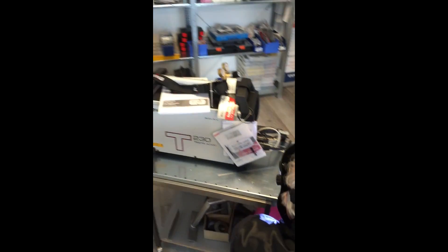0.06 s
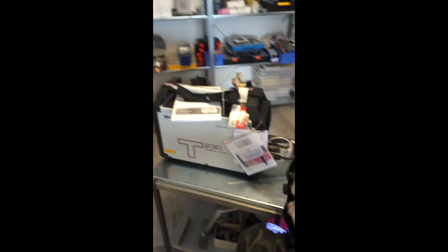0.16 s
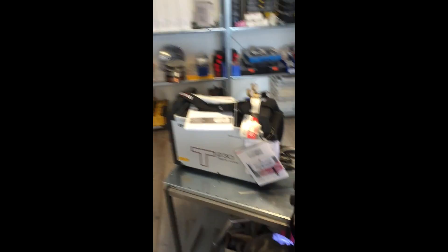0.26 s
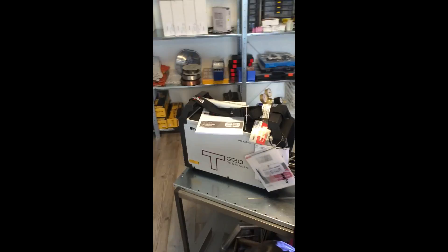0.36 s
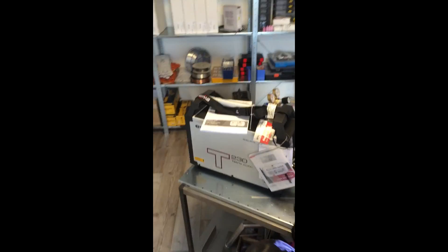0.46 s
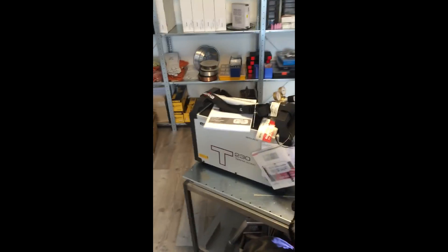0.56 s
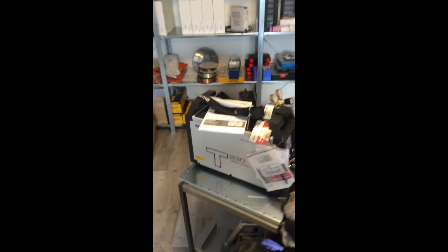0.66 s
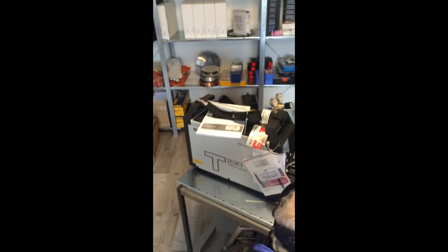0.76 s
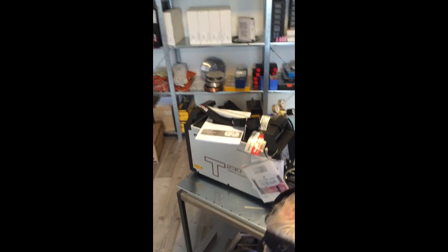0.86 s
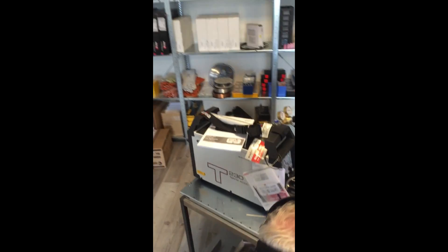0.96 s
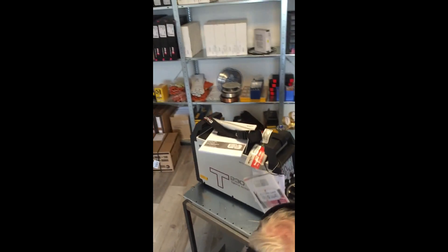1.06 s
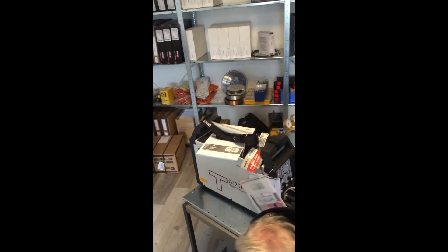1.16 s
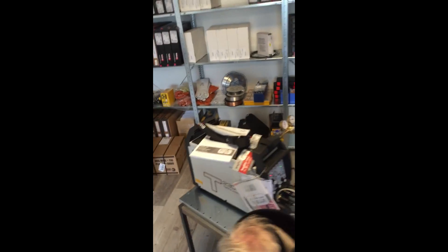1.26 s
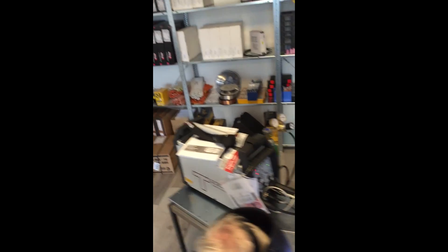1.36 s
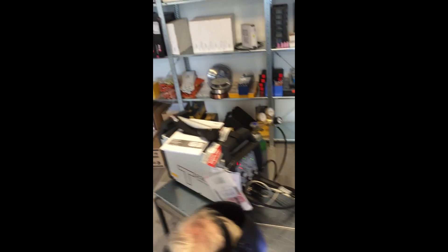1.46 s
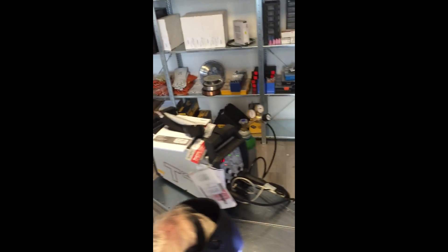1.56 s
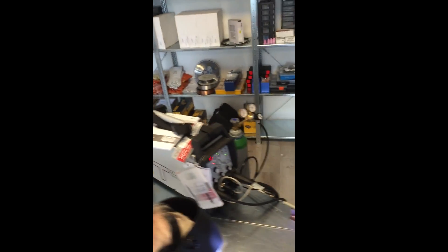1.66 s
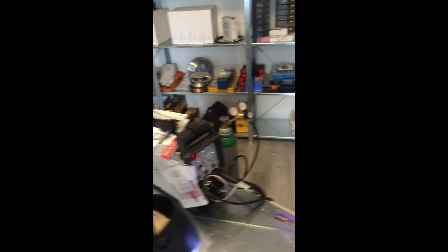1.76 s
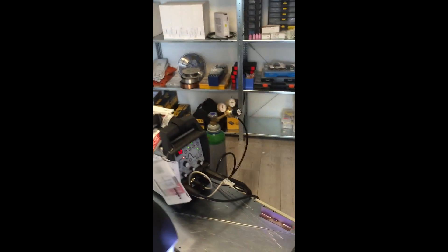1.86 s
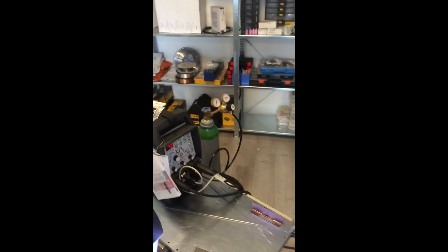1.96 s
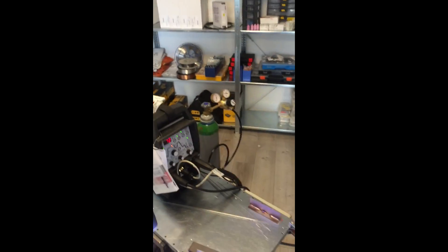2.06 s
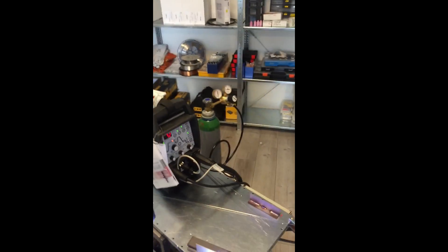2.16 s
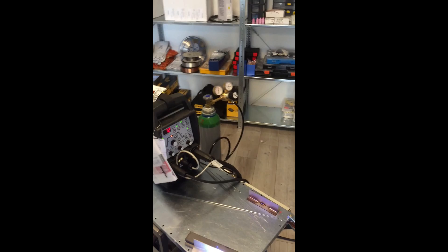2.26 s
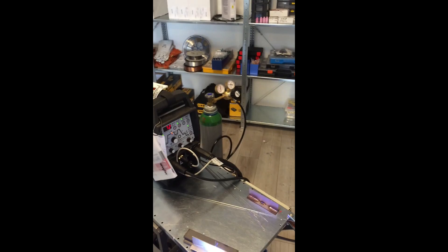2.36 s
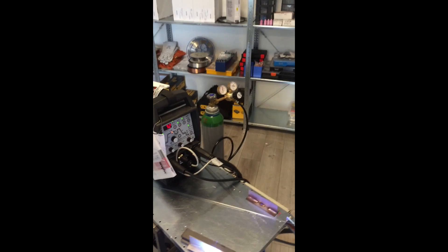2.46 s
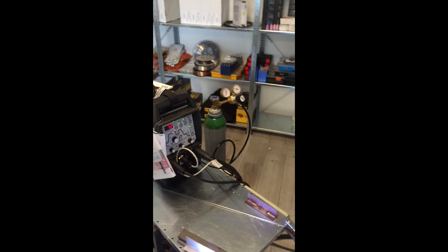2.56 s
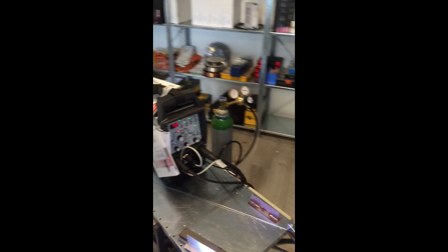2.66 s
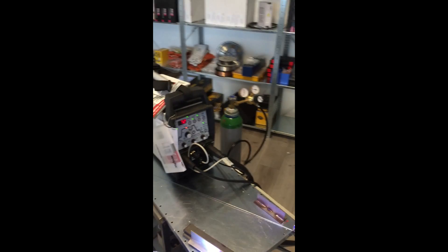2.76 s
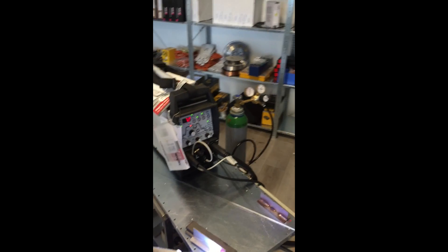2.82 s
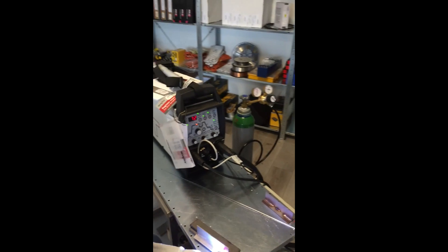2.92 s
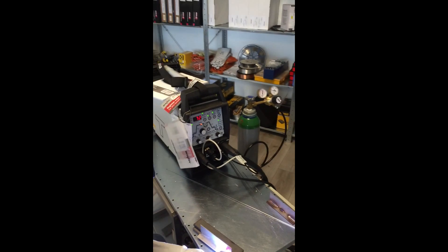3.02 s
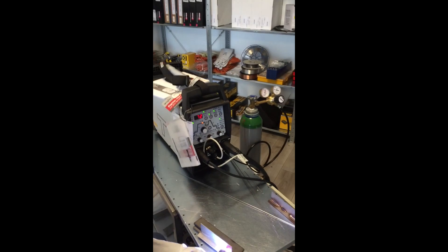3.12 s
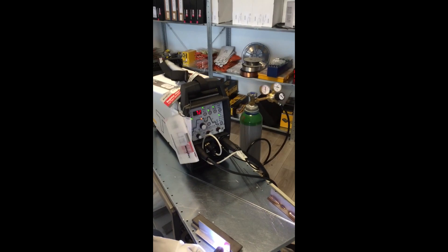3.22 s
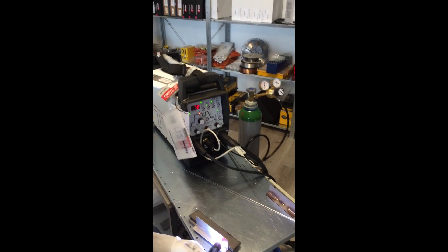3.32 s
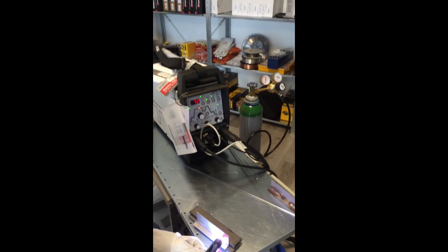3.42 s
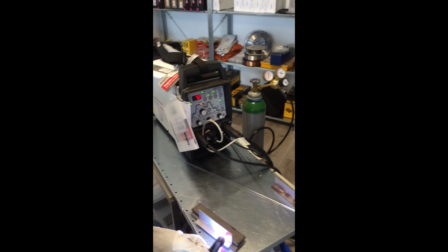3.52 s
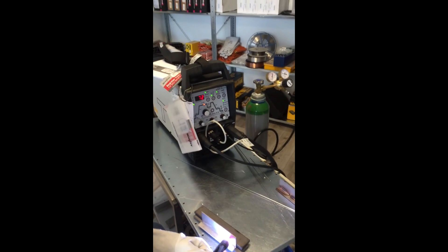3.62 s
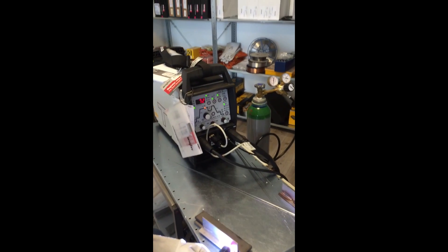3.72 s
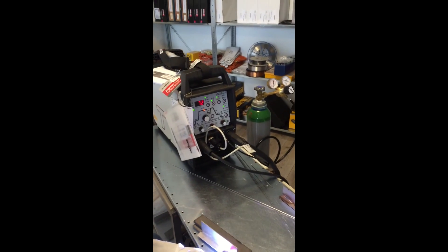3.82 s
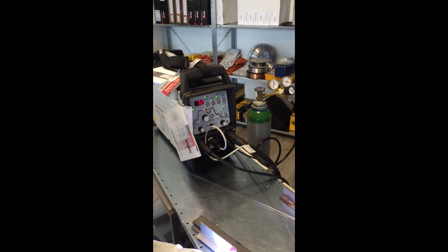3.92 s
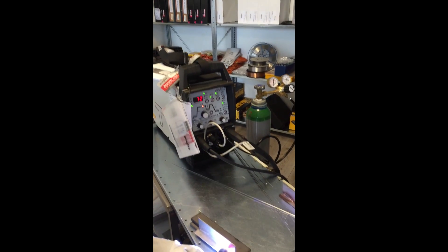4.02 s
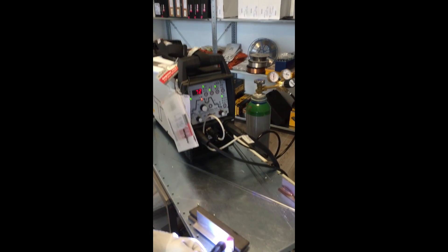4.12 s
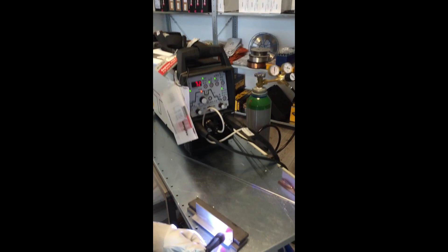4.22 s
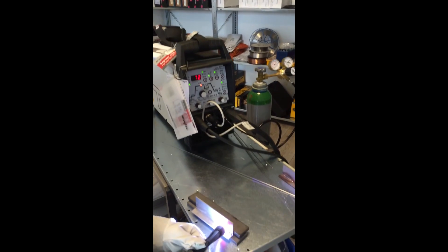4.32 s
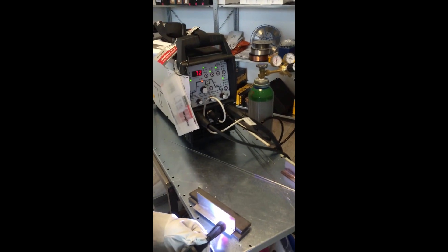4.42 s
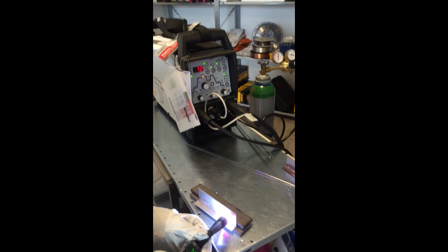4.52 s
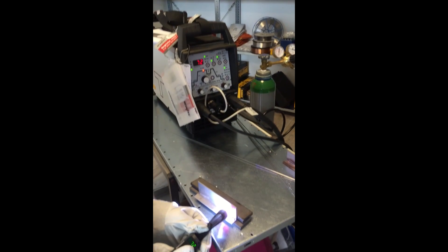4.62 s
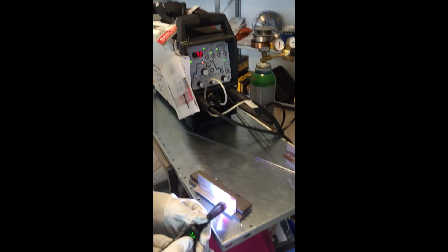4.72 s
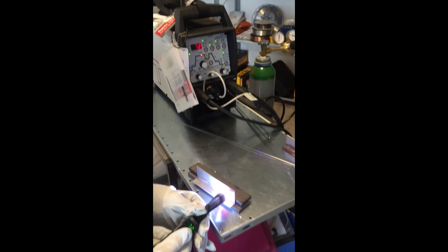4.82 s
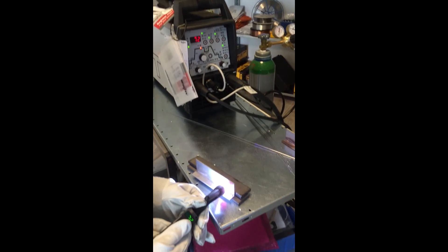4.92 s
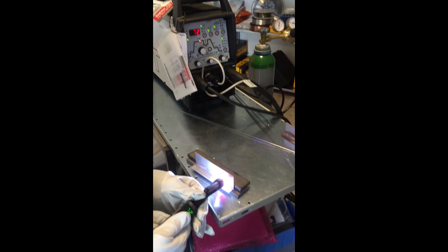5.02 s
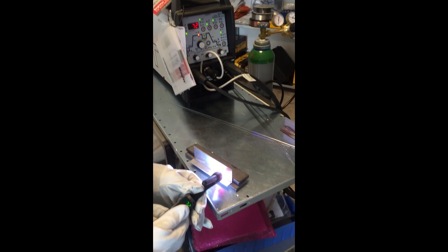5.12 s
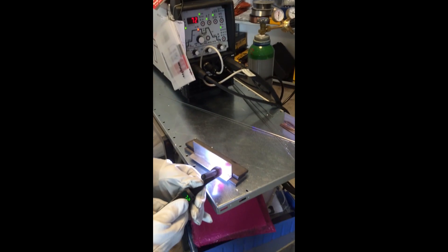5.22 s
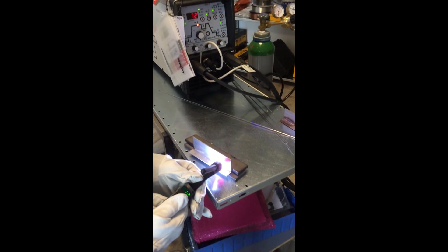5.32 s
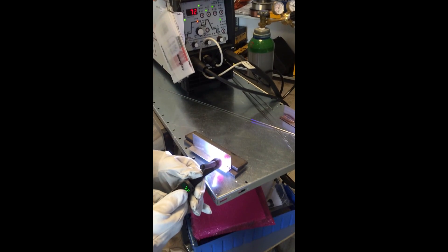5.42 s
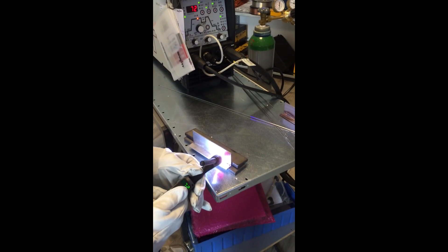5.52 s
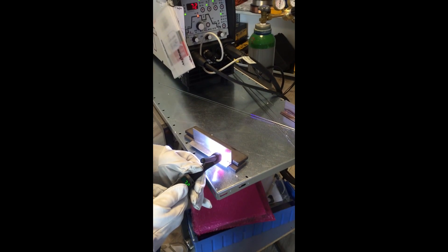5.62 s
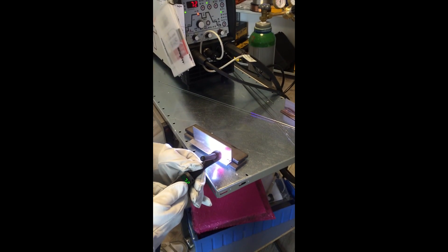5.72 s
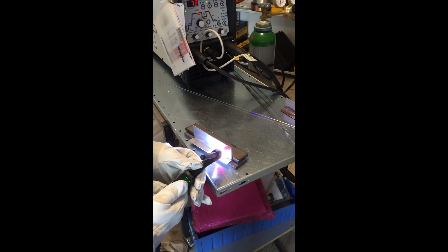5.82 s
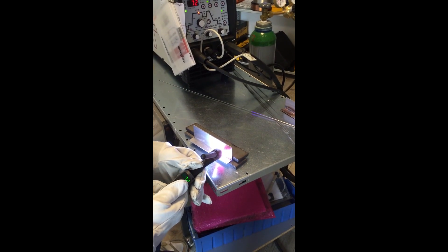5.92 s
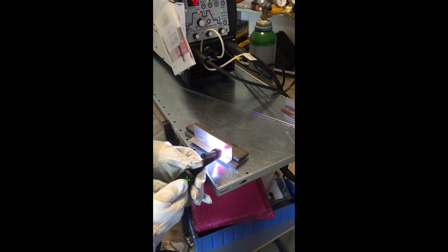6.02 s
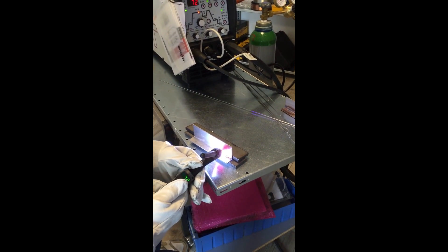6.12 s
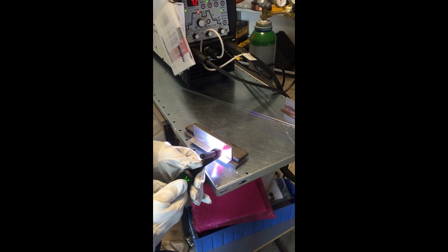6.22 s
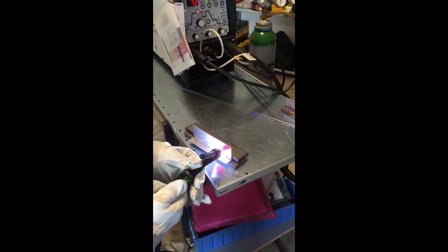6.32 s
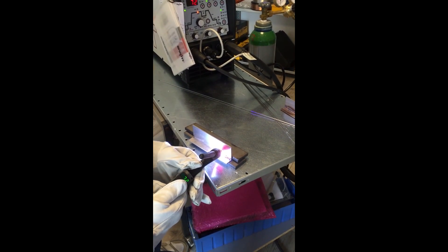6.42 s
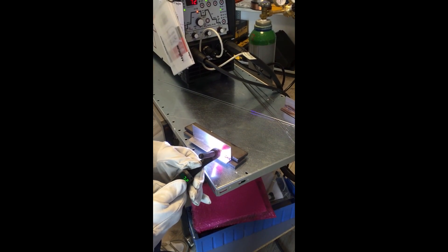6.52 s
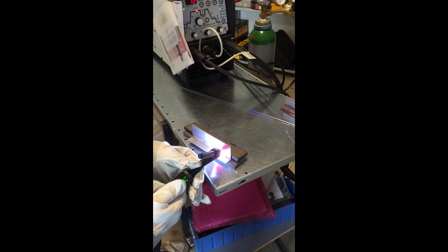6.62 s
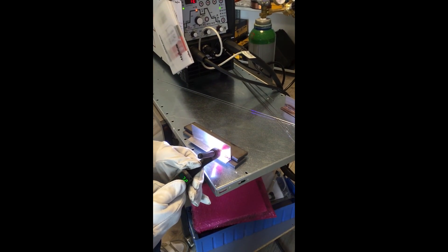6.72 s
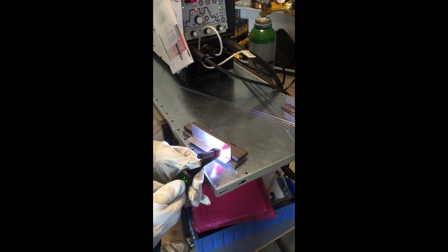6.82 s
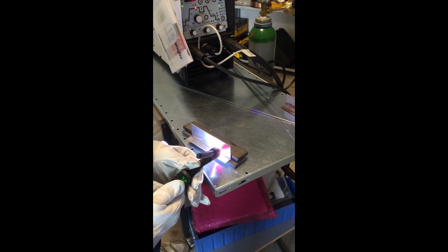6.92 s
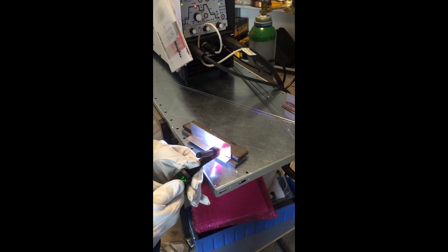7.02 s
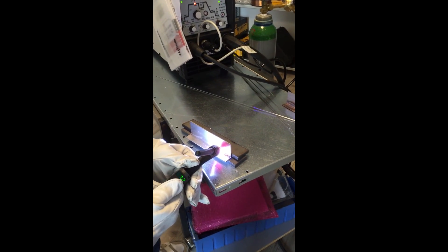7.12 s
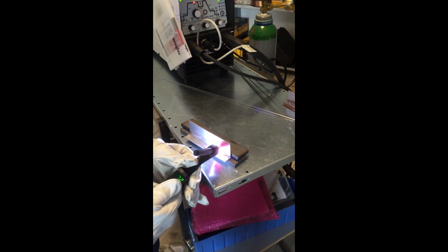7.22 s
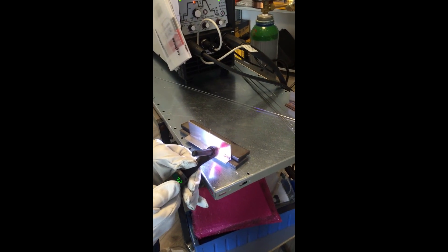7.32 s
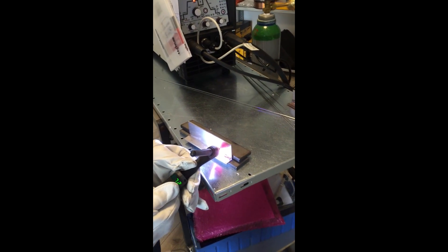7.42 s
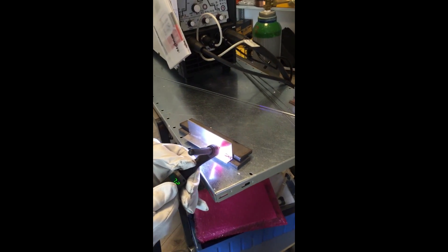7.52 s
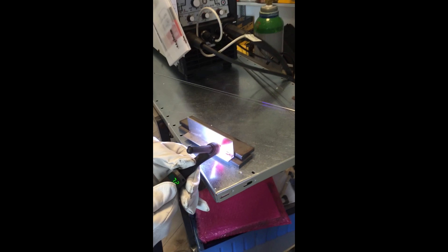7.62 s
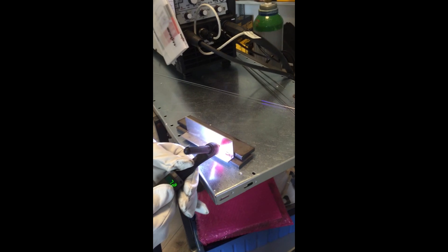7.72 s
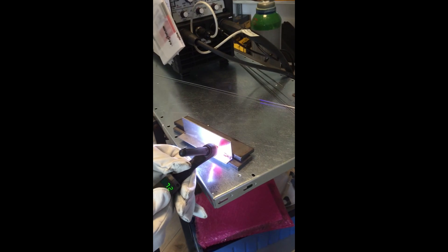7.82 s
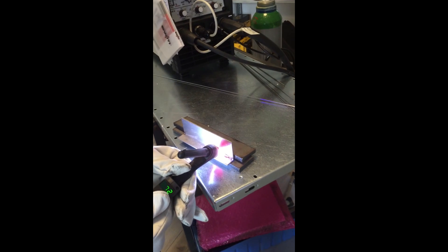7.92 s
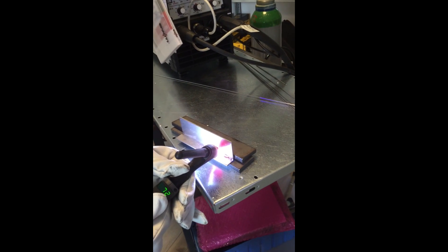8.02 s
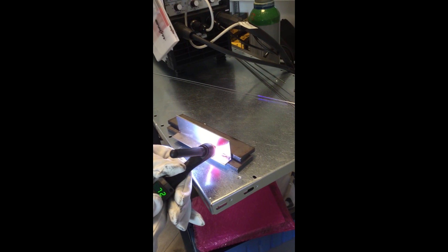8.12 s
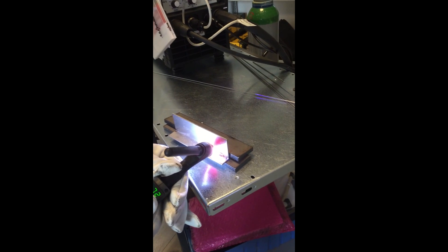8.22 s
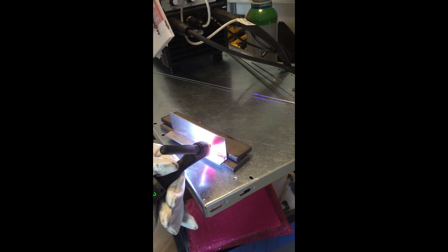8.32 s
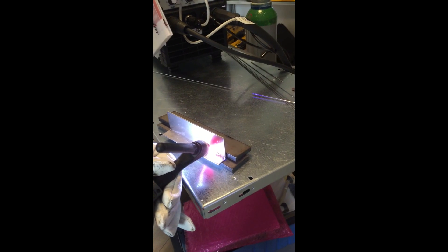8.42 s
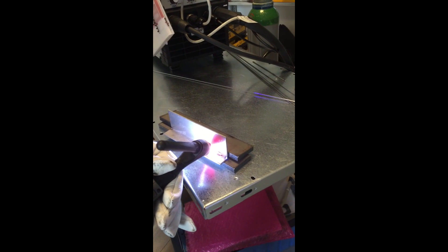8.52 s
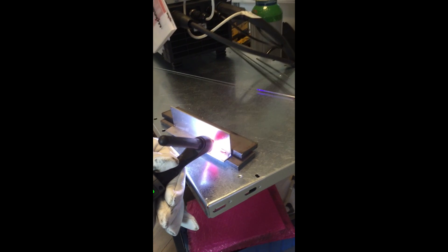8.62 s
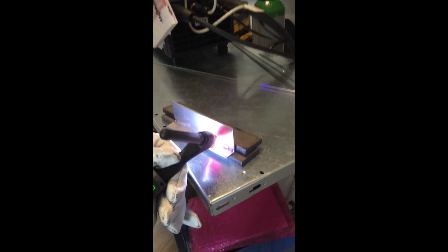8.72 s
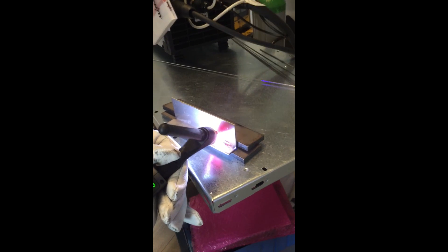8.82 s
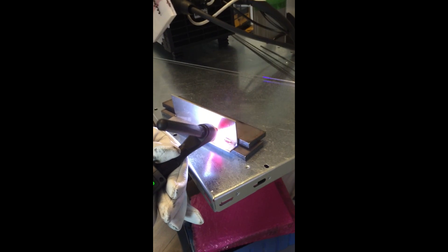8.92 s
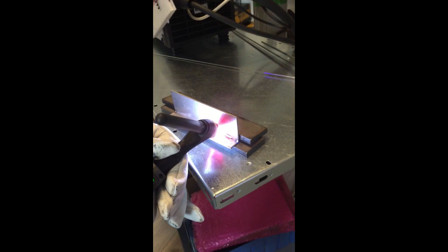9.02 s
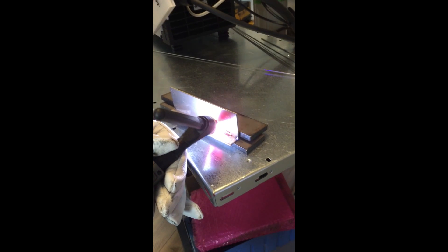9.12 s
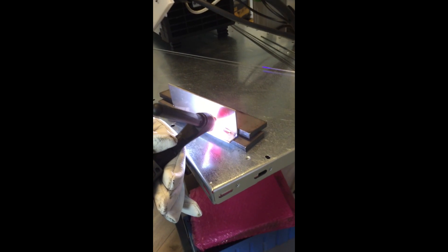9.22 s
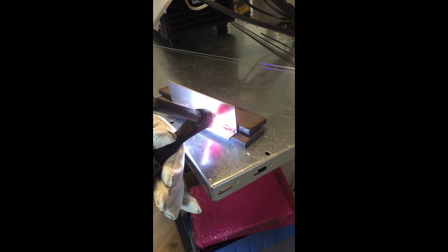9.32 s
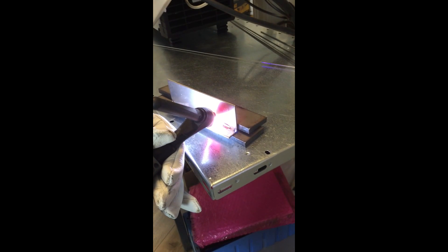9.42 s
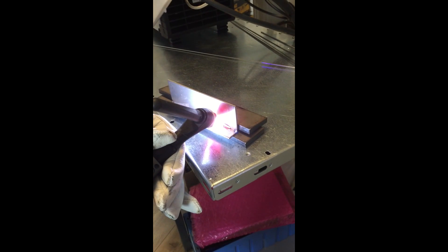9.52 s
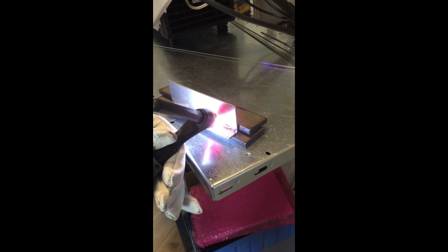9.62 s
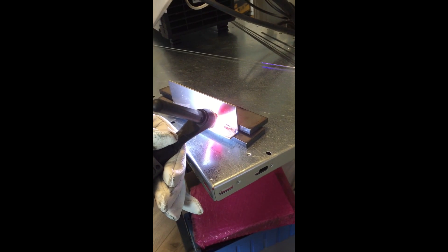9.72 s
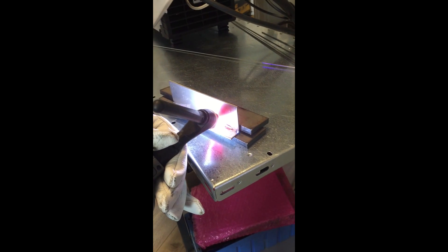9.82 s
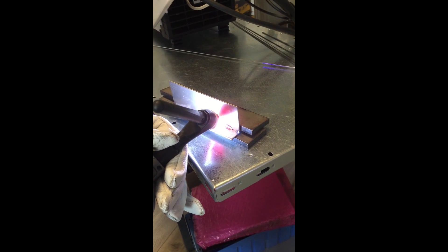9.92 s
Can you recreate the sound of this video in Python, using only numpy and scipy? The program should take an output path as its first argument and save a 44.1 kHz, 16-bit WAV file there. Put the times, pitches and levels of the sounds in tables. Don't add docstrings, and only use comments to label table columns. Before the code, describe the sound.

A gas jet and electric arc rush steadily over a metal bench, first from behind equipment, then directly and close. The microphone moves in, so the hiss gets louder and its hollow, sweeping metallic colour slides downward. A faint piercing whine fades in and out; low thuds and knocks mark the walk early on, small crackles pop, and a faint stool creak comes near the end.

```python
import sys
import numpy as np
from scipy import signal
from scipy.fft import rfft, irfft, next_fast_len
from scipy.io import wavfile
from scipy.ndimage import uniform_filter1d, map_coordinates

SR = 44100
rng = np.random.default_rng(int(sys.argv[2]) if len(sys.argv) > 2 else 0)


def bounce(signal):
    frames = np.transpose(np.atleast_2d(signal))
    limited = np.clip(frames, -1, 1)
    pcm = np.round(limited * 32767).astype(np.int16)
    wavfile.write(sys.argv[1], SR, pcm)


def field_ratio(decibels):
    return 10 ** (np.asarray(decibels, dtype=float) / 20)


N = 439224
TIME = np.arange(N) / SR
SIZE = next_fast_len(N + 8000)
HZ = np.fft.rfftfreq(SIZE, 1 / SR) + 1
LOG_HZ = np.log(HZ)

# [t/s, level/dB]
HISS_LEVEL = [(0.0, -56.5), (0.16, -62.5), (0.22, -57), (0.4, -52), (0.94, -53), (1.06, -47.5), (1.3, -46),
              (1.5, -46), (2.0, -43.5), (2.38, -46), (3.3, -45.5), (3.94, -46), (4.4, -44), (4.88, -43.5),
              (5.49, -44.5), (5.75, -45.5), (5.95, -44), (6.18, -44.5), (6.88, -46.5), (6.96, -44.5),
              (7.3, -44), (7.55, -43), (7.75, -44), (8.13, -42), (8.24, -43.5), (8.46, -43.5), (8.8, -42.5),
              (9.15, -40), (9.4, -41), (9.96, -42)]
# [t/s, share hidden]
HIDDEN = [
    (0, 1),
    (.17, 0.58),
    (.24, 0.37),
    (.62, 0.81),
    (.8, 0.04),
    (1.0, 0.14),
    (1.06, 0),
    (1.2, 0),
]


def rms_one(x):
    return x / np.sqrt(np.mean(x ** 2) + 1e-20)


def in_time(rows):
    s, *columns = np.transpose(rows)
    return [np.interp(TIME, s, c) for c in columns]


def at_hz(points):
    points = np.array(points)
    return field_ratio(np.interp(LOG_HZ, np.log(points[:, 0]), points[:, 1]))


def drift(rate_hz):
    r = np.exp(-2 * np.pi * rate_hz * 40 / SR)
    chance = rng.standard_normal(N // 40 + 2002)
    slow = signal.lfilter([1], [1, -2 * r, r * r], chance)[2000:]
    return np.interp(np.arange(N) / 40, np.arange(len(slow)), rms_one(slow))


def coloured(x, spectrum, low_hz, high_hz, order=6):
    edges = (1 + (low_hz / HZ) ** (2 * order)) * (1 + (HZ / high_hz) ** (2 * order))
    return rms_one(irfft(x * at_hz(spectrum) / np.sqrt(edges), SIZE)[:N])


def late(x, ms):
    return map_coordinates(x, [np.arange(N) - ms * SR / 1000], order=3, mode="mirror")


def hump(at, length):
    return np.exp(-8 * ((TIME - at) / length) ** 2)


def tone(hz, level_db, wobble_hz, flutter_db):
    phase = 2 * np.pi * np.cumsum(hz + wobble_hz * drift(16)) / SR
    return np.sqrt(2) * field_ratio(level_db + flutter_db * drift(15)) * np.sin(phase)


def puff(white, at, length, low_hz, high_hz, db, order=2):
    out = np.zeros(N)
    near = np.abs(TIME - at) < length + .05
    bandpass = signal.butter(order, [low_hz, high_hz], "band", fs=SR, output="sos")
    noise = rms_one(signal.sosfilt(bandpass, white[near]))
    out[near] = field_ratio(db) * noise * hump(at, length)[near]
    return out


def puffs(rows):
    white = rng.standard_normal(N)
    out = np.zeros(N)
    for at, length, hz, octaves, db in rows:
        half = 2 ** (octaves / 2)
        out = out + puff(white, at, length, hz / half, hz * half, db)
    return out


def postures():
    # [t/s, share aside, share close]
    turn = [
        (0, 1, 0),
        (2.4, 0.97, 0.13),
        (3.0, 0.67, 0.23),
        (3.7, 0.51, 0.18),
        (4.3, 0.21, 0.28),
        (7.6, 0.11, 0.53),
        (8.5, 0, 0.76),
        (9.96, 0.094, 1),
    ]
    aside, close = np.clip(in_time(turn), 0, 1)
    return np.array([1 - aside - close, aside, close])


def arc():
    # [f/Hz, level/dB]
    cup_facing = [(410, -53), (700, -12), (783, -21.5), (876, -8), (968, -15), (1160, -13.5), (1530, -1.5),
                  (2110, 5), (2640, -6), (3080, -25), (3400, -56), (4420, -44), (7480, -120)]
    cup_aside = [(410, -42), (700, -45), (906, -17), (1200, -13), (1280, -10.5), (1360, -4), (1470, -11),
                 (1650, -0.5), (2130, 0), (2900, -15), (3400, -12), (4420, -52), (7480, -120)]
    # [f/Hz, level/dB]
    column_facing = [(1590, -68), (2700, -21), (3060, -26.5), (3690, -17.5), (4740, -29.5), (5750, -28.5),
                     (6470, -9.5), (8200, -2), (10100, -10.5), (11100, 1), (11600, -5.5), (11900, 1.5),
                     (12800, 6), (14400, 6), (15800, -9)]
    column_aside = [(1590, -42), (2700, -29), (3020, -50), (3320, -48), (3880, -23.5), (4810, -36),
                    (5300, -20), (5880, -12.5), (7120, -7), (8380, -4), (9440, -12), (11900, 3),
                    (12800, -0.5), (13100, -0.5), (15800, -5.5)]
    column_close = [(1590, 10.5), (2700, -5.5), (3230, -23.5), (3520, -21), (5030, -22), (5450, -15.5),
                    (5820, -18), (6120, -13.5), (6710, -7.5), (7230, -14.5), (8320, -2.5), (10200, -20.5),
                    (11500, -7), (11900, -12), (12800, 2), (14500, 1), (15800, -12.5)]
    borders = [2900, 5600, 10000]
    # [t/s, level/dB]
    swing = [(0, 12.5), (.3, 8.5), (.9, -7.5), (1.4, 0), (2.9, 1.5), (3.6, 4), (4.4, 1.5), (6, -2.5),
             (7.8, -3.5), (8.4, -2), (9.2, -6)]

    straight = jet()
    posture = postures()
    wall_gain = field_ratio(-9.5 + 1.5 * posture[1])
    heard = straight + bench_bounce(straight, posture[2]) + near_and_far_bounces(straight)
    heard = rfft(heard + wall_gain * walls(straight, pace=1.27), SIZE)

    def band(colours, low_hz, high_hz):
        return sum(share * coloured(heard, colour, low_hz, high_hz) for share, colour in zip(posture, colours))

    # facing, aside, close, in dB
    offsets_db = np.array([(-16, -22.5, -11),
                           (-19, -18, -17),
                           (-8, -4, -7),
                           (-2.5, -7.5, -3.5)])
    cup_db, low_db, middle_db, top_db = in_time(HISS_LEVEL)[0] + offsets_db @ posture
    swing_db, = in_time(swing)
    cup_db = cup_db + 0.75 * swing_db
    low_db = low_db - 0.78 * swing_db
    buzz = (1 + .5 * drift(5)) * np.sin(2 * np.pi * 100 * TIME)
    middle_db = middle_db + 0.6 * buzz
    top_db = top_db + 1.0 * buzz

    first, second, third = borders
    cup = (cup_facing, cup_aside, cup_facing)
    column = (column_facing, column_aside, column_close)
    out = field_ratio(cup_db + 1.5 * drift(6.0)) * band(cup, 440, 2810)
    out = out + field_ratio(low_db + .5 * drift(9.8)) * band(column, first, second)
    out = out + field_ratio(middle_db + 1.03 * drift(1.5)) * band(column, second, third)
    out = out + field_ratio(top_db + 0.43 * drift(8)) * band(column, third, SR)
    return behind_machine(out)


def jet():
    # [f/Hz, depth]
    mains = [
        (100, .04),
        (200, .03),
        (300, .025),
    ]
    ripple = 1 + sum(depth * np.sin(2 * np.pi * hz * TIME) for hz, depth in mains)
    unrest_db = 0.53 * drift(3.5) + 0.4 * drift(40) + 0.54 * drift(84)
    return rng.standard_normal(N) * ripple * field_ratio(unrest_db) + spits()


def spits():
    # [t/s, level over the hiss/dB]
    bursts = [
        (1.5837, 14),
        (2.682, 18),
        (5.4602, 22),
        (5.6768, 19),
        (7.488, 16),
        (7.952, 13),
    ]
    clicks = np.zeros(N)
    for at, db in bursts:
        clicks[int(at * SR)] = field_ratio(db + 9)
    return signal.lfilter(*signal.butter(1, 4500, fs=SR), clicks + 1e-18)


def bench_bounce(straight, close):
    # [t/s, detour/ms]
    detour = [(2.0, .15), (2.3, .205), (2.5, .252), (2.8, .303), (3.1, .37), (3.25, .389), (3.5, .414),
              (3.8, .432), (4.1, .474), (4.4, .518), (4.9, .574), (5.5, .61), (5.8, .62), (6.4, .625),
              (7.0, .652), (7.3, .678), (7.6, .724), (8.0, .795), (8.4, .857), (8.7, .902), (9.3, .95),
              (9.96, .972)]
    part_shares = [1, -.51, .51, -.066]
    part_delays = [0, .05, .185, .005]
    # [f/Hz, level/dB]
    steel = [(3000, 5.5), (4700, 1), (6000, 0), (7400, 5.5), (8700, -1), (10100, -2.5), (11800, -2.5),
             (13000, -2), (15000, -3)]
    # [t/s, share]
    view = [(2.1, 0), (2.4, .75), (3.0, .7), (3.3, .9), (4.2, .9), (4.8, 1), (6.9, 1), (7.3, .8),
            (7.7, 1.1), (8.4, 1.1), (8.9, .7), (9.96, .7)]
    spread = sum(share * np.exp(-2j * np.pi * HZ * ms / 1000) for ms, share in zip(part_delays, part_shares))
    bounced = irfft(rfft(straight, SIZE) * spread * at_hz(steel), SIZE)[:N]
    detour_ms, = in_time(detour)
    pace = uniform_filter1d(np.gradient(detour_ms) * SR, size=SR // 4)
    seen, = in_time(view)
    level_db = -7 - 6 * pace - 2.5 * close
    return seen * field_ratio(level_db) * late(bounced, detour_ms)


def near_and_far_bounces(straight):
    # [t/s, detour/ms, share]
    glove = [(3.9, .25, 0), (4.3, .26, .15), (4.8, .285, .22), (5.2, .3, .15), (5.7, .31, 0), (7.6, .22, 0),
             (8.2, .225, .05), (8.5, .23, .15), (9.96, .235, .15)]
    # [t/s, detour/ms, share]
    front = [(0, .2, .1), (.6, .24, .25), (1.0, .4, .25), (1.6, .46, .2), (2.1, .5, 0), (7.9, 1.2, 0),
             (8.1, 1.2, 0), (8.4, 1.3, .12), (8.9, 1.43, .16), (9.3, 1.468, .2), (9.96, 1.47, .2)]
    near_ms, near_share = in_time(glove)
    far_ms, far_share = in_time(front)
    return near_share * late(straight, near_ms) + far_share * late(straight, far_ms)


def walls(x, pace):
    age = np.arange(SR // 8) / SR
    decay = field_ratio(-60 * age / .06) * (age > .0015)
    tails = rng.standard_normal((3, len(age))) * decay
    weights = np.array([drift(pace) for tail in tails])
    weights = weights / np.sqrt(np.sum(weights ** 2, axis=0))
    spectrum = rfft(x, SIZE)
    return sum(w * rms_one(irfft(spectrum * rfft(tail, SIZE), SIZE)[:N]) for w, tail in zip(weights, tails))


def behind_machine(x):
    # [f/Hz, level/dB]
    bending = [(4500, 1), (6500, 7), (8200, -1.5), (9300, -16), (10100, -3.5), (11300, -2), (13600, -0.5),
               (14300, -4), (15000, -17), (15600, -10)]
    bent = irfft(rfft(x, SIZE) * at_hz(bending), SIZE)[:N]
    return x + np.clip(in_time(HIDDEN)[0], 0, 1) * (bent - x)


def singing_cup():
    # [t/s, length/s, f/Hz, width/octaves, level/dB]
    songs = [
        (1.25, .4, 2130, .12, -70),
        (1.85, .6, 2080, .15, -65),
        (4.2, .5, 2000, .3, -63),
        (3.25, 1.5, 2150, .1, -62),
        (8.05, .7, 2200, .15, -60),
    ]
    return puffs(songs)


def inverter():
    # [t/s, f/Hz, level/dB]
    whistle = [(0, 12308, -58), (.6, 12316, -57), (1.36, 12322, -52), (2.0, 12324, -52),
               (2.5, 12316, -51.5), (3.6, 12323, -50), (4.6, 12318, -47.5), (5.1, 12317, -47.5),
               (5.5, 12315, -51), (5.96, 12314, -49), (6.88, 12316, -52.5), (7.5, 12320, -46.5),
               (9.07, 12318, -45.5), (9.68, 12315, -52), (9.96, 12312, -53)]
    # [multiple of 100 Hz, level below it/dB]
    sidebands = [(-1, -16.5), (1, -18.5), (2, -23)]
    # [f/Hz, level against the hiss/dB, wobble/Hz, flutter/dB]
    faint_lines = [(6105, -24.5, .3, 1), (9023, -23.5, 1, 1.5), (13227, -18, 8, 2.5)]
    # [t/s, length/s, depth/dB]
    dead_spots = [(.15, .1, 11), (.37, .2, 12), (.82, .4, 7), (2.42, .2, 6), (3.15, .6, 6), (3.82, .35, 8),
                  (4.38, .15, 8), (4.82, .25, 4), (5.3, .2, 8), (7.35, .2, 10), (7.68, .2, 15),
                  (8.22, .15, 13), (8.75, .35, 3.5), (9.66, .2, 3)]
    hz, level_db = in_time(whistle)
    level_db = level_db - sum(db * hump(at, length) for at, length, db in dead_spots)
    out = tone(hz, level_db - .5, .3, 1)
    out = out + sum(tone(hz + 100 * k, level_db + db, 1, 3) for k, db in sidebands)
    hiss_db = in_time(HISS_LEVEL)[0] - 10 * in_time(HIDDEN)[0]
    for line_hz, db, wobble_hz, flutter_db in faint_lines:
        fading_db = hiss_db + db + 3 * drift(3)
        out = out + tone(line_hz * hz / 12317, fading_db, wobble_hz, flutter_db)
    return out


def thuds():
    # [f/Hz, level/dB]
    floor_colour = [(100, 7.5), (300, 12.0), (500, 1)]
    out, boom = np.zeros(N), np.zeros(N)
    for at, peak_db, hz in touches():
        heavy = hz < 140
        rise = 1.05 * (hz / 300) ** .35 / hz
        age = np.arange(int(9 * rise * SR)) / SR / rise
        start = int((at - rise) * SR)
        sag = .45 * heavy + .01
        turns = 2 * np.pi * (1 + sag) * hz * rise * np.log(1 + sag * age) / sag
        shape = (age * np.exp(1 - age)) ** (2.1 - .5 * heavy)
        out[start:start + len(age)] += field_ratio(peak_db) * shape * np.sin(turns - .4 - 2.8 * heavy)
        boom[int(at * SR)] = field_ratio(peak_db - 20.5) * (hz > 180)
    dying = signal.lfilter([1], [1, -field_ratio(-60 / (.28 * SR))], boom + 1e-18)
    noise = rfft(rng.standard_normal(N), SIZE)
    return out + dying * coloured(noise, floor_colour, 137, 440, order=2)


def touches():
    # [t of peak/s, peak level/dB, f/Hz, rebounds]
    knocks = [(.084, -59, 75, 0), (.223, -39, 245, 1), (.412, -58, 380, 1), (.12, -63, 65, 0),
              (.155, -61, 75, 0), (.275, -53, 225, 0), (.325, -59, 90, 1), (.44, -61, 135, 0),
              (.472, -60, 390, 0), (2.2, -63, 70, 0), (2.232, -62, 310, 0), (2.292, -60, 75, 0),
              (2.745, -60, 110, 0), (.972, -57, 285, 0), (.975, -58, 115, 0), (.9, -62, 70, 0),
              (1.055, -61, 270, 0), (1.18, -60, 170, 0), (1.285, -62, 280, 1), (1.155, -49, 285, 1),
              (1.3, -64, 70, 0), (1.706, -38, 318, 0), (1.714, -45, 300, 0), (1.742, -46, 260, 1),
              (1.777, -48, 345, 2), (1.95, -61, 150, 0), (2.02, -60, 350, 0), (2.259, -58, 80, 0),
              (2.412, -54, 75, 0), (2.43, -48, 248, 0), (2.676, -49, 231, 0), (3.018, -60, 65, 0),
              (3.319, -34, 307, 0), (3.338, -46, 290, 3), (3.526, -52, 307, 0), (5.222, -48, 102, 0),
              (6.17, -60, 280, 0), (7.498, -47, 100, 0), (7.857, -49, 124, 0), (8.889, -43, 113, 0),
              (8.966, -47, 113, 0)]
    gap_s, loss_db, pitch_spread = .018, 4, .05
    out = []
    for at, db, hz, rebounds in knocks:
        for k in range(rebounds + 1):
            detune = pitch_spread * rng.standard_normal() * (k > 0)
            out.append((at + k * gap_s, db - k * loss_db, hz * (1 + detune)))
    return out


def scuffs():
    # [t/s, length/s, f/Hz, width/octaves, level/dB]
    rubs = [(1.15, .1, 500, .9, -67), (1.12, .14, 800, .4, -71), (1.08, .04, 600, .3, -71),
            (2.74, .12, 560, 1.2, -70), (2.79, .16, 950, 1, -70), (1.73, .08, 600, 1.0, -70),
            (3.322, .03, 560, .7, -57), (7.5, .03, 900, 2.2, -69), (8.56, .05, 640, .5, -70),
            (8.882, .025, 330, .8, -64), (5.85, .6, 320, .6, -76), (6.4, .6, 280, .8, -77),
            (.965, .03, 400, .6, -72), (5.222, .03, 250, .8, -64), (7.497, .025, 340, 1.2, -63),
            (8.558, .03, 690, .25, -65), (1.584, .012, 4000, .5, -62), (5.46, .005, 3200, 1.4, -55),
            (5.677, .004, 3300, 1, -58), (8.83, .02, 780, .6, -68), (.295, .04, 3800, 1.2, -68),
            (2.68, .02, 3900, 1.1, -67), (7.49, .012, 2400, 2, -57), (7.96, .015, 3300, 1.2, -64)]
    return puffs(rubs)


def stool_creak():
    # [t/s, length/s, f/Hz, level/dB]
    creaks = [
        (8.57, .07, 580, -73),
        (8.62, .05, 590, -75),
        (8.73, .16, 572, -69),
        (8.84, .18, 575, -75),
        (8.76, .14, 1143, -68),
        (8.66, .05, 870, -70),
    ]
    return sum(tone(hz, db, 4, 3) * hump(at, length) for at, length, hz, db in creaks)


def room():
    # [f/Hz, level/dB]
    rumble = [(15, -50), (25, -28), (50, -12), (100, -11), (170, -14), (300, -12), (450, -15), (800, -15),
              (1200, -14), (1600, -22), (3300, -80)]
    # [t/s, share]
    motion = [
        (0, 0.42),
        (.6, 0.64),
        (.9, 0.89),
        (3.8, 0.79),
        (4.3, 0),
        (6.9, 0.29),
        (7.2, 1),
        (8.2, 0.38),
        (9.96, 0.73),
    ]
    at_rest_db = np.array([-81.5, -81, -81.5])
    rise_db = (5, 1.5, 0.5)
    low_db, middle_db, upper_db = at_rest_db[:, None] + np.outer(rise_db, in_time(motion)[0])
    upper_db = upper_db + 4.5 * postures()[2]
    white = rng.standard_normal(N)
    noise = rfft(white + .35 * walls(white, pace=1.5), SIZE)
    low = field_ratio(low_db + 1.5 * drift(5)) * coloured(noise, rumble, 38, 170, order=3)
    middle = field_ratio(middle_db + 1.8 * drift(7)) * coloured(noise, rumble, 170, 450, order=3)
    upper = field_ratio(upper_db + .8 * drift(5)) * coloured(noise, rumble, 450, 1300, order=3)
    return low + middle + upper


def shop_hiss():
    noise = rfft(rng.standard_normal(N), SIZE)
    return field_ratio(-75.5) * coloured(noise, [(2000, 0), (5000, -1)], 1300, 6000, order=3)


def scene():
    mono = arc() + singing_cup() + inverter() + thuds() + scuffs() + stool_creak() + room() + shop_hiss()
    return np.stack([mono, mono])


def roll_off(x):
    return signal.sosfilt(signal.butter(12, 16000, fs=SR, output="sos"), x)


def record(dry):
    # [t/s, low f/Hz, high f/Hz, level/dB]
    slips = [(.82, 4200, 5200, -85), (1.0, 8300, 9600, -67), (3.115, 7600, 9000, -56),
             (4.49, 4200, 5200, -77), (6.53, 13100, 14500, -54), (7.3, 13800, 15200, -55),
             (7.79, 4200, 5200, -76), (8.135, 7600, 9000, -55), (8.135, 14500, 15700, -55),
             (8.295, 13100, 15200, -52), (9.34, 10300, 11700, -62)]
    white = rng.standard_normal(N)
    apart = sum(puff(white, at, .03, low_hz, high_hz, db + 3.5, order=8) for at, low_hz, high_hz, db in slips)
    top_cut = signal.ellip(14, .5, 70, 15720, fs=SR, output="sos")
    low_cut = signal.butter(2, 32, "high", fs=SR, output="sos")
    mix = signal.sosfilt(np.vstack([top_cut, low_cut]), dry + apart * [[1], [-1]])
    return roll_off(mix)


dry = scene()
out = record(dry)
bounce(out)
```